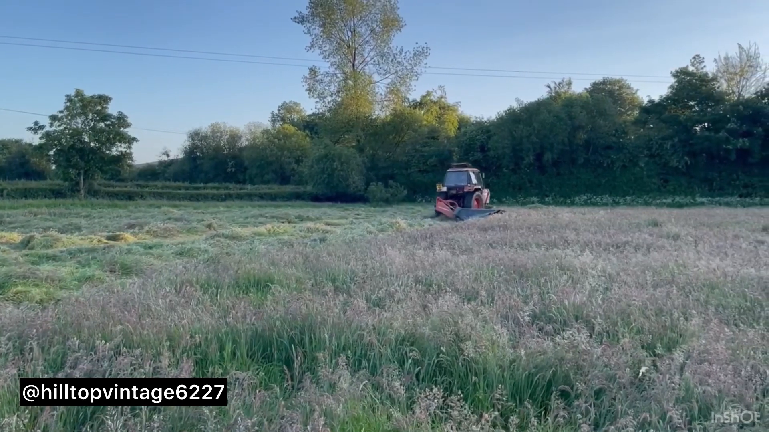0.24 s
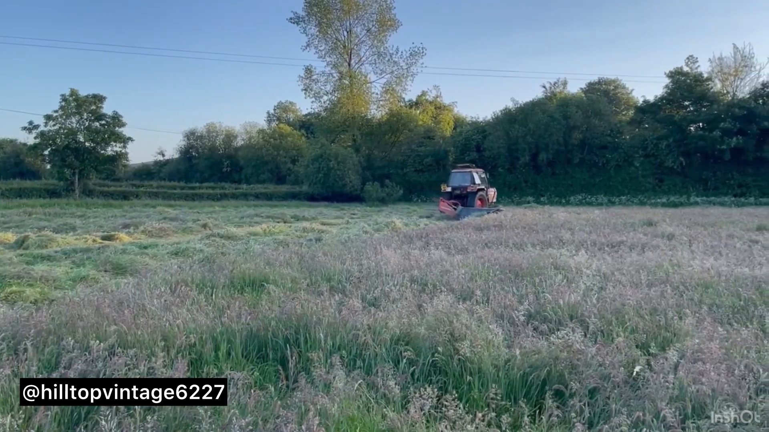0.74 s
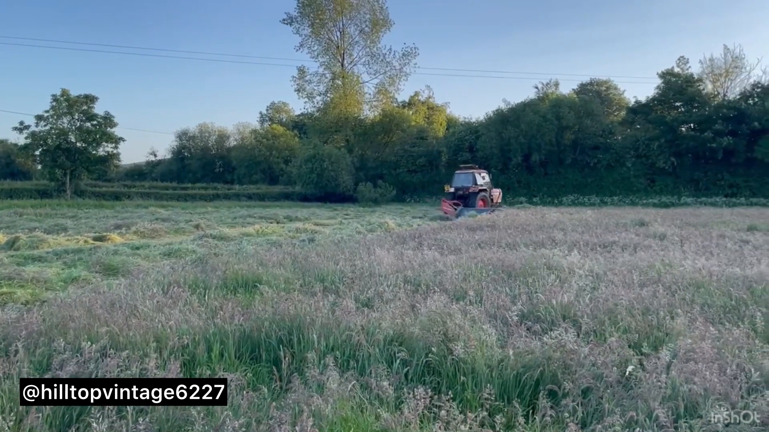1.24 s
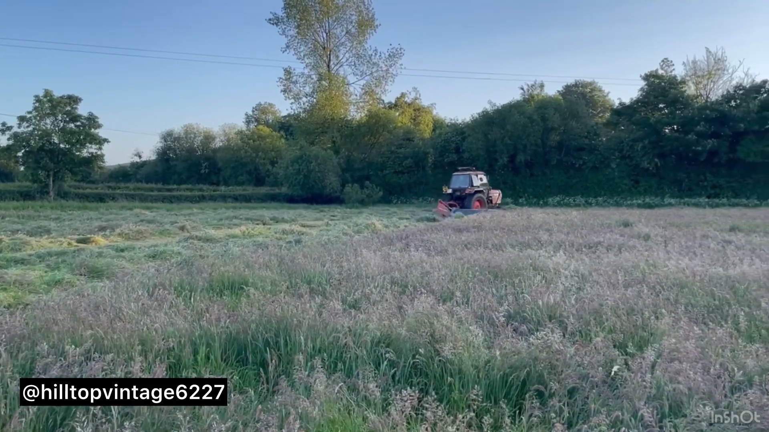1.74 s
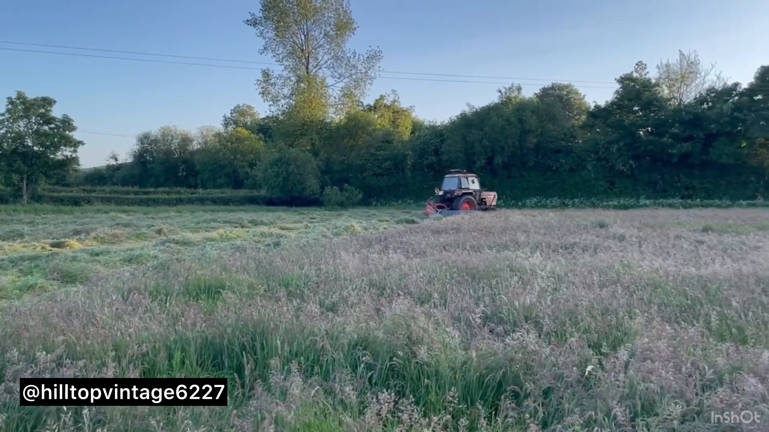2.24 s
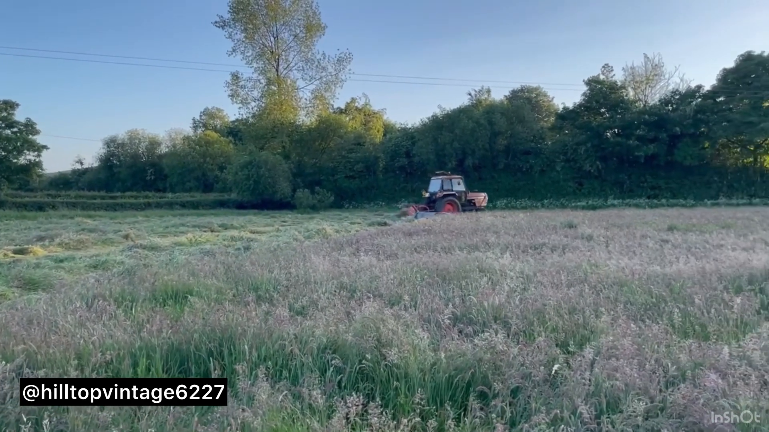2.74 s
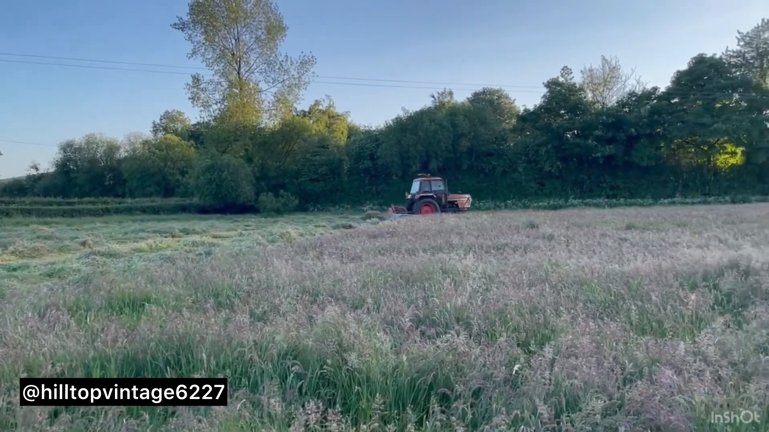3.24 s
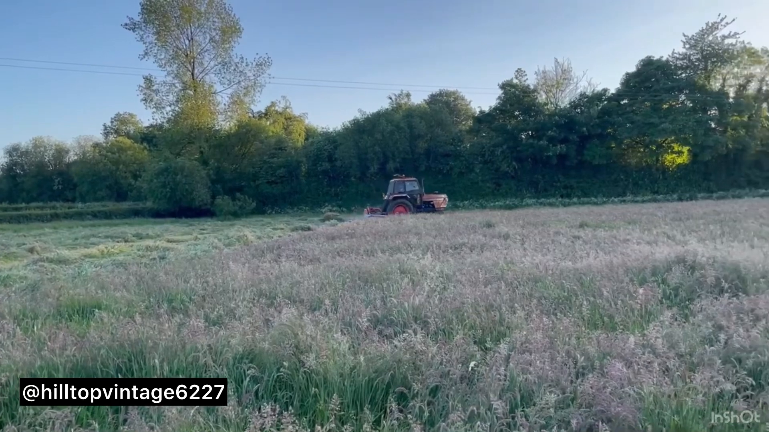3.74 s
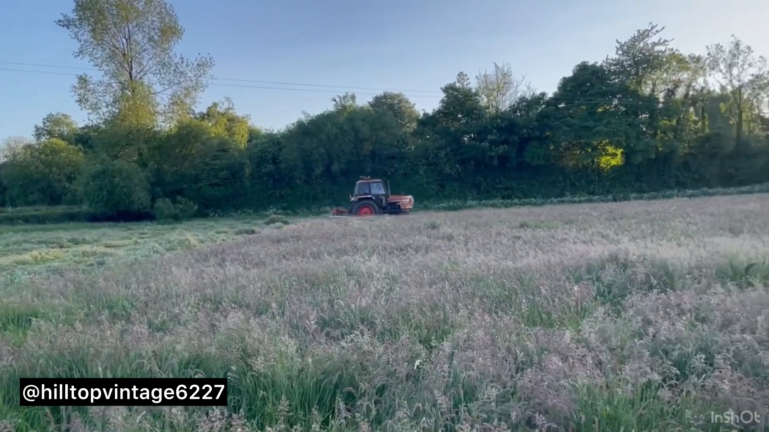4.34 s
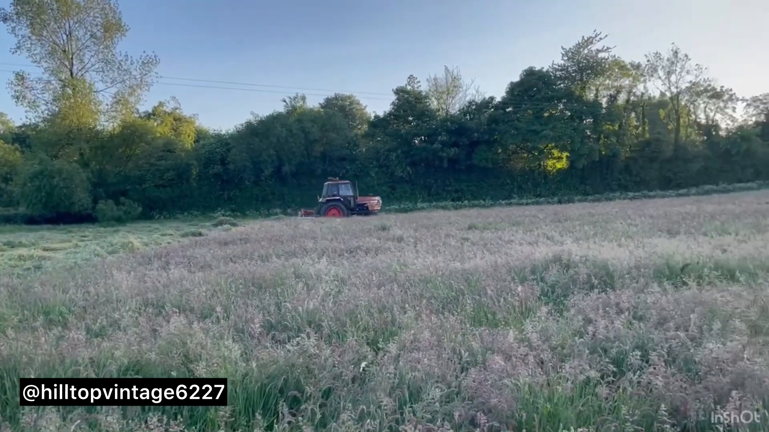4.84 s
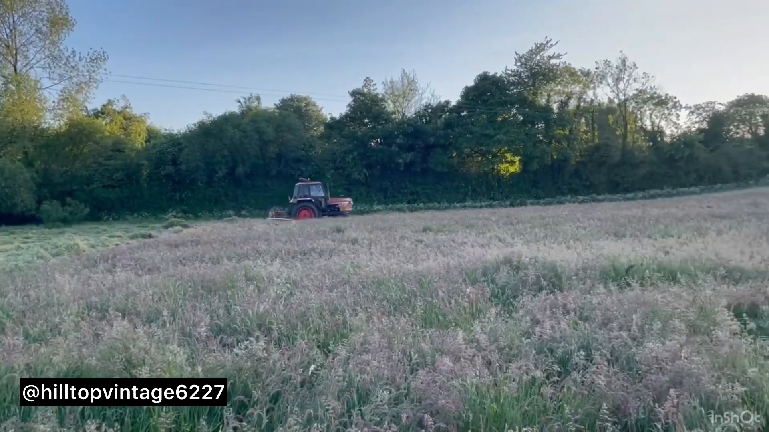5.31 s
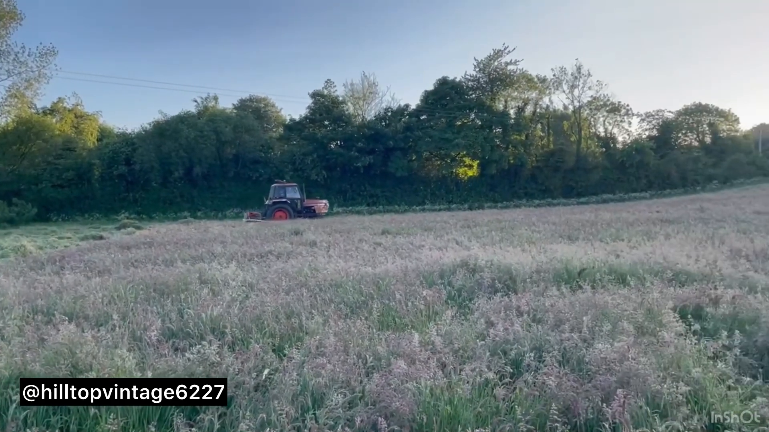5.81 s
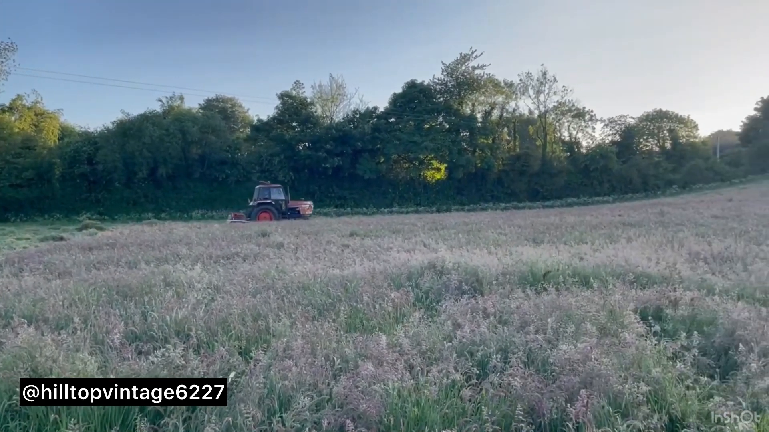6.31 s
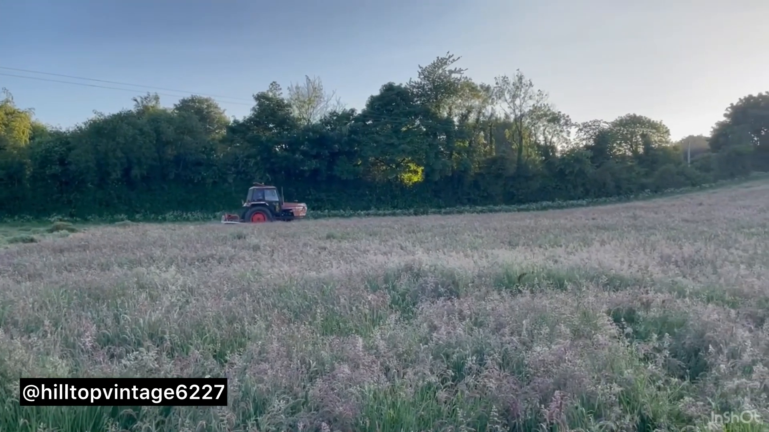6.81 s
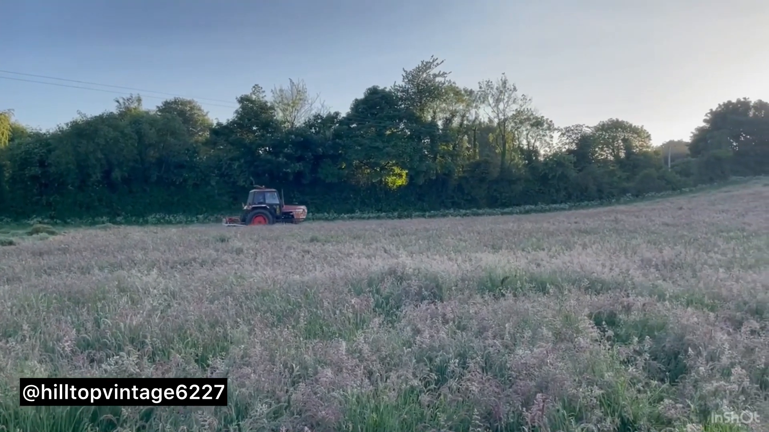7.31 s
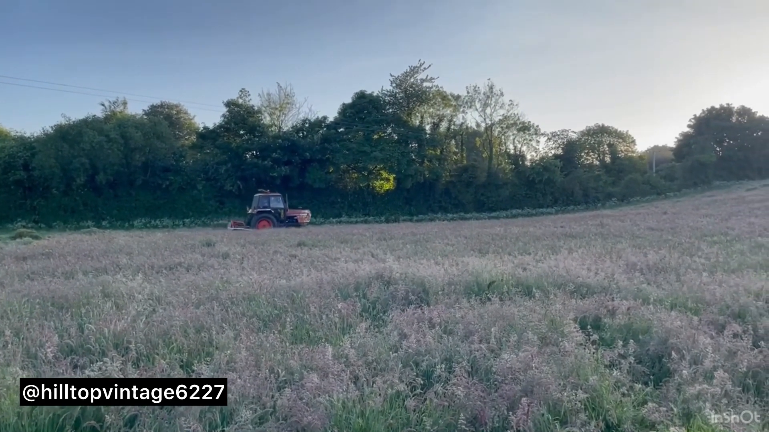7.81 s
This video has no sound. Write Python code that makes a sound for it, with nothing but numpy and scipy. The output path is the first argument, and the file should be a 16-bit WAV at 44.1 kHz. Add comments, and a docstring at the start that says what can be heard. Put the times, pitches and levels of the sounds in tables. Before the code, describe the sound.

Continuous outdoor drone of a tractor pulling a disc mower, heard from a distance with no start or stop. Dense diesel knocking rides over blade hum and hissing grass. Early on there is a soft wind rumble, a faint gear whine and small high clicks; midway the knock sharpens and the roar grows a little, then short metallic rattles come and go. Stereo microphone, open air, no echo.

```python
"""Tractor mowing a meadow

A four-cylinder diesel some way off drives a disc mower and slowly turns side-on. Geared sines make exhaust
beat and blade hum; decaying modes make the knock; shaped noise makes the roar and the wash of cut grass.
A gear whines, a faint fuzzy high tone lies near 7.7 kHz, a jolted part rattles, grains tick in the treble,
and low noise is light wind at a two-port microphone."""
import sys
import numpy as np
from scipy import signal
from scipy.io import wavfile
from scipy.ndimage import uniform_filter1d

SR = 44100
rng = np.random.default_rng(int(sys.argv[2]) if len(sys.argv) > 2 else 0)


def store_pcm(level_fs):
    """Save levels as 16-bit WAV."""
    pcm = np.round(np.clip(level_fs, -1, 1) * 32767).astype(np.int16)
    wavfile.write(sys.argv[1], SR, np.atleast_2d(pcm).T)


N = 355446
IGNITION_BEATS = 0.29  # place of the bang within each exhaust beat


def amp(db):
    """Decibels to amplitude."""
    return 10 ** (np.asarray(db) / 20)


def evened(x):
    """Scale to unit RMS."""
    return x / np.sqrt(np.mean(x ** 2) + 1e-20)


def curves(rows, t=None):
    """Columns of a time table, joined by straight lines."""
    if t is None:
        t = np.arange(N) / SR
    s, *columns = np.transpose(rows)
    return [np.interp(t, s, c) for c in columns]


def spectra(rows, hz):
    """Columns of a frequency table over log frequency, as column vectors."""
    f, *columns = np.transpose(rows)
    return [np.interp(np.log(hz + 1), np.log(f + 1), c)[:, None] for c in columns]


def wander(cutoff_hz):
    """Slow random drift of unit RMS: low-passed noise."""
    lowpass = signal.butter(2, cutoff_hz, fs=SR, output="sos")
    return evened(signal.sosfilt(lowpass, rng.standard_normal(N)))


def tone(turns, rms_db):
    """Sine from its phase in turns."""
    return np.sqrt(2) * amp(rms_db) * np.sin(2 * np.pi * turns)


def frames(x):
    """Short-time spectrum."""
    return signal.stft(x, SR, nperseg=1024, noverlap=768)


def unframe(z):
    """Waveform of a short-time spectrum."""
    return signal.istft(z, SR, nperseg=1024, noverlap=768)[1][..., :N]


# Turn of the machine, and shading of the right port. Each row: time in seconds, heading from 0 = rear to 1 =
# side-on, roar level in dB, shading of the right port from 0 to 1.
TURN_PATH = [(0, 0.28, -36.5, 0.06), (1, 0.35, -36.5, 0), (2, 0.41, -35.5, 0), (3, 0.56, -35, 0.12),
             (4, 0.72, -33.5, 0.14), (5, 0.94, -33, 0.65), (6, 0.93, -34, 1), (7, 0.91, -34, 1),
             (8.06, 1, -33.5, 0.8)]


def turn(t=None):
    """Heading and roar level as the machine turns, and the shading of the right port over time."""
    return curves(TURN_PATH, t)


# Engine speed. Each row: time in seconds, firings per second.
FIRING_RATE = [(0.0, 56.86), (0.82, 56.6), (1.08, 55.9), (1.4, 57.2), (1.65, 56.3), (2.89, 56.24),
               (3.38, 57.46), (4.15, 56.35), (4.92, 56.52), (5.11, 55.69), (5.7, 56.66), (5.93, 56.03),
               (6.18, 57.16), (6.81, 55.81), (7.12, 57.35), (7.46, 55.83), (8.06, 56.95)]


def firing_rate(t=None):
    """Firings per second, which also pace the geared parts."""
    return curves(FIRING_RATE, t)[0]


# Wind spectrum. Each row: frequency in Hz, relative level in dB.
WIND_SPECTRUM = [(25, -12), (36, -8), (45, 13), (70, 11), (110, 9.5), (150, 6), (200, -4.5), (300, -91)]
# Wind strength. Each row: time in seconds, level in dB.
WIND_GUSTS = [(0, -32.5), (.35, -39), (.95, -29.5), (1.6, -39), (3.3, -36.5), (4.7, -42), (5.5, -44),
              (8.06, -40)]


def wind():
    """Lumpy low noise at the microphone, nearly alike at both ports."""
    hz, _, z = signal.stft(rng.standard_normal((2, N)), SR, nperseg=4096)
    shaped = z * amp(spectra(WIND_SPECTRUM, hz)[0])
    noise = signal.istft(shaped, SR, nperseg=4096)[1][:, :N]
    common, difference = evened(noise) * amp(curves(WIND_GUSTS)[0] + 1.8 * wander(7))
    return common + 0.048 * difference * np.array([[1], [-1]])


# Treble ticks. Each row: start in seconds, nominal level in dB, centre frequency in Hz.
TICK_EVENTS = [(0.6389, -57, 10100), (0.6549, -56, 10500), (0.6716, -43, 10300), (0.7632, -60, 10500),
               (0.8684, -58, 10800), (0.9572, -54, 11400), (0.9807, -54, 10900), (0.992, -56, 9900),
               (1.0146, -53, 11000), (1.034, -58, 11100), (1.2431, -57, 10200), (1.259, -55, 10100),
               (1.276, -55, 10300), (1.387, -53, 11300), (1.404, -56, 11600), (1.6472, -56, 10100),
               (2.0343, -51, 9900), (2.052, -53, 9850), (2.127, -44.5, 10000), (2.251, -52, 10300),
               (2.2682, -50, 10000), (2.3206, -55, 10200), (2.3391, -53, 10300), (2.6758, -56, 10400),
               (2.6928, -58, 10500), (2.7811, -49, 10200), (4.5477, -48, 10060), (4.6364, -56, 10000),
               (4.8135, -57, 10500), (5.8636, -57, 10100)]


def ticks():
    """Each tick is a tight burst of five short high grains, most of them weaker than the one before."""
    rise_s, spacing_s, spread_hz = 0.0007, 0.0014, 1000
    out, t = np.zeros(N + 2000), np.arange(200) / SR
    envelope = (t / rise_s) * np.exp(1 - t / rise_s)
    luck = rng.random((len(TICK_EVENTS), 3, 5))
    for (start_s, db, hz), (late, off, size) in zip(TICK_EVENTS, luck):
        for k in range(5):
            delay_s = k * spacing_s * (0.6 + 0.8 * late[k])
            grain_hz = hz + spread_hz * (off[k] - 0.5)
            grain = envelope * np.sin(2 * np.pi * grain_hz * t)
            i = round((start_s + delay_s) * SR)
            out[i:i + 200] += amp(db + 8.0 - 2.1 * k - 3.5 * size[k]) * grain
    return out[:N]


# Rattle jolts, four to every two firings: relative level in dB.
JOLT_PATTERN_DB = [-4, -1, -12, -4]
# Bouts of rattling. Each row: start in seconds, length in seconds, mean level in dB.
RATTLE_BOUTS = [(3.913, 0.1, -46), (4.15, 0.037, -46), (4.25, 0.17, -49), (4.57, .16, -48.5),
                (4.93, 0.19, -47), (5.33, 0.092, -43), (5.48, 0.063, -43), (5.62, .06, -46),
                (5.74, .04, -45), (5.92, 0.091, -45.5), (6.043, .06, -44), (6.2, .1, -44), (6.59, .07, -46),
                (6.7, 0.13, -46.5), (6.865, 0.15, -43.5), (7.528, .22, -47), (7.796, .18, -46)]


def rattle(fired):
    """A loose part is jolted in a pattern that repeats every two firings; each jolt rings briefly."""
    between_bouts_db, peak_over_mean_db = -52.5, 7
    ring_hz, rise_s = 4195, 0.0025
    at = np.flatnonzero(np.diff((2 * fired + 1.1).astype(int)))
    luck = rng.standard_normal((len(at), 2))
    out, t = np.zeros(N + 800), np.arange(800) / SR
    envelope = (t / rise_s) * np.exp(1 - t / rise_s)
    level_db = between_bouts_db - 10 * (1 - turn()[0])  # fainter towards the rear
    for start_s, length_s, db in RATTLE_BOUTS:
        level_db[round(start_s * SR):round((start_s + length_s) * SR)] = db
    for k, i in enumerate(at):
        ring = envelope * np.sin(2 * np.pi * (ring_hz + 30 * luck[k, 0]) * t)
        jolt_db = JOLT_PATTERN_DB[(k + 2) % 4] + 3 * luck[k, 1]
        out[i:i + 800] += amp(level_db[i] + peak_over_mean_db + jolt_db) * ring
    return out[:N]


# Gear whine. Each row: time in seconds, level in dB.
GEAR_LEVEL = [(0, -50), (.25, -43), (.47, -50), (.65, -43), (1.05, -49), (1.45, -41), (1.6, -52),
              (8.06, -52)]
# Faint high tone. Each row: time in seconds, frequency in Hz.
HIGH_TONE_PITCH = [(0, 7600), (4.9, 7700), (5.6, 7880)]


def whines(fired):
    """A gear whine tied to the shaft speed and a faint fuzzy high tone near 7.7 kHz."""
    contacts_per_firing, high_tone_db = 22.12, -64.5
    gear_turns = contacts_per_firing * fired + 0.017 * wander(11)
    gear = tone(gear_turns, curves(GEAR_LEVEL)[0] + 2.0 * wander(21))
    high_tone_hz = curves(HIGH_TONE_PITCH)[0] + 15 * wander(40)
    return gear + tone(np.cumsum(high_tone_hz) / SR, high_tone_db + 3 * wander(15))


# Roar spectrum. Each row: frequency in Hz, dB from the rear, dB from the side,
# share of power that pulses with the firings.
BODY_SPECTRUM = [(175, -12.5, -2.5, 0.38), (305, -10.5, -33.5, 0.061), (346.7, -10, -6.5, 0.081),
                 (454, -15, -15, 0.1), (956, -5.5, -6, 0.16), (1332, -6.5, -9, 0.25),
                 (1656, -10, -20, 0.23), (1973, -7, -8, 0.18), (2370, -17.5, -20.5, 0.094),
                 (3150, -12.5, -15, 0.075), (3440, -12.5, -22.5, 0.11), (4240, -17, -18, 0.16),
                 (4650, -18, -23, 0.33), (7440, -21, -28, 0.36), (7680, -40.5, -55.5, 1),
                 (9500, -27, -37, 0.66), (11730, -39.5, -48, 0.15), (12800, -56, -52, .3)]
# Panel resonances added to the roar. Each row: frequency in Hz, width (two sigma) in Hz,
# boost in dB from the rear, boost in dB from the side.
PANEL_RESONANCES = [(662, 360, 8, 5), (2230, 81, 4.5, 6.5), (2377, 200, 4, 7), (2600, 350, 5.5, 5.5),
                    (3550, 230, 7.5, -1.5), (3650, 39, -2.5, 2.5), (4160, 240, 7, -5.5), (5650, 760, -1, 3),
                    (7694, 250, 21, 30)]
# Firing hiss of the four cylinders in turn: relative level in dB.
CYLINDER_HISS_DB = [0, 0.64, -0.017, 0.4]


def firing_gate(fired):
    """Each firing opens the noise quickly and lets it sink until the next; times in beats."""
    rise_beats, decay_beats = 0.084, 1.13
    beats = fired - IGNITION_BEATS + 4
    stroke, phase = beats.astype(int), beats % 1
    strength_db = np.array(CYLINDER_HISS_DB)[stroke % 4] + 2.2 * rng.standard_normal(N // 500)[stroke]
    return amp(strength_db) * (1 - np.exp(-phase / rise_beats)) * np.exp(-phase / decay_beats)


def air_patches(hz, t):
    """Moving air over the field makes patches of the spectrum swell and fade, in dB."""
    def smooth_noise(bins, steps):
        noise = rng.standard_normal((len(hz), len(t)))
        return evened(uniform_filter1d(uniform_filter1d(noise, bins, 0), steps, 1))

    treble = np.clip(hz[:, None] / 5000, 0, 1.5)
    return 0.81 * (smooth_noise(14, 25) + 0.98 * treble * smooth_noise(90, 16))


def roar(fired):
    """Firing-gated noise and a steady wash of grass and air share one body; two unrelated draws."""
    swish_hz, swish_at_s, swish_db = 6100, 3.94, 2  # the swish of cut grass brightens for a moment
    hz, t, pulsing = frames(evened(firing_gate(fired) * rng.standard_normal((2, N))))
    wash = frames(rng.standard_normal((2, N)))[2]
    heading, level_db, _ = turn(t)
    rear_db, side_db, share = spectra(BODY_SPECTRUM, hz)
    for f, width_hz, rear, side in PANEL_RESONANCES:
        bump = np.exp(-0.5 * ((hz[:, None] - f) / (width_hz / 2)) ** 2)
        rear_db, side_db = rear_db + rear * bump, side_db + side * bump
    octaves_off = np.log2(hz[:, None] / swish_hz + 1e-9)
    swish = swish_db * np.exp(-((t - swish_at_s) / 0.5) ** 2 - (2 * octaves_off) ** 2)
    z = (np.sqrt(share) * pulsing + np.sqrt(1 - share) * wash) * (hz[:, None] > 60)
    z *= amp(rear_db + heading * (side_db - rear_db) + swish + air_patches(hz, t))
    rms = np.sqrt(np.mean(unframe(z) ** 2))
    return unframe(z * amp(level_db) / rms)


# Blade hum. Each row: time in seconds, blade hum in dB, its octave in dB.
BLADE_LEVELS = [(0.0, -33.5, -40), (0.09, -31, -35), (1.01, -30.5, -44), (1.34, -31.5, -61),
                (1.57, -30, -40), (2.4, -34, -44.5), (3.59, -36, -33.5), (4.18, -30.5, -37),
                (4.24, -30.5, -51), (4.33, -33, -35), (5.0, -30.5, -43), (5.09, -26.5, -30.5),
                (5.81, -29, -42), (6.08, -29, -33.5), (7.9, -33, -37.5), (8.06, -39, -45.5)]
# Third harmonic of the blade hum. Each row: time in seconds, level in dB.
BLADE_THIRD_LEVEL = [(0, -52.5), (2.6, -51.5), (2.9, -71), (3.6, -64), (4.4, -56), (4.9, -62), (5.3, -57.5),
                     (7.1, -58), (8.06, -60)]
# Further machine lines, from engine, gear and blades. Each row: multiple of the firing rate, level in dB.
MACHINE_LINES = [(1.25, -49), (1.75, -50), (2.25, -49), (6.233, -53), (7.45, -57), (17, -53), (19, -55)]


def hum(fired, heading):
    """Exhaust beat, blade hum and further machine lines as wavering sines geared to the firings."""
    blade_passes_per_firing = 1.4905  # set by the gearing
    beat_db, octave_rear_db, octave_side_db = -32, -29.5, -40
    # the governor cuts fuel when the engine runs ahead: the exhaust beat softens a moment later
    usual_firings_per_s, db_per_firing_per_s, fuel_lag_s = 56.42, -2.5, 0.094
    ahead = firing_rate(np.arange(N) / SR - fuel_lag_s) - usual_firings_per_s
    fuel_db = db_per_firing_per_s * uniform_filter1d(ahead, SR // 6)
    # the beat's octave changes sign between rear and side
    octave = (1 - heading) * amp(octave_rear_db) - heading * amp(octave_side_db)
    out = tone(fired + 0.32, beat_db + fuel_db + 0.8 * wander(3))
    out += octave * tone(2 * fired + 0.29, fuel_db + 2 * wander(3))
    blades = blade_passes_per_firing * fired
    blade_db, blade_octave_db = curves(BLADE_LEVELS)
    out += tone(blades + 0.22, blade_db) + tone(2 * blades + 0.3, blade_octave_db)
    third_db = curves(BLADE_THIRD_LEVEL)[0] + 2.9 * wander(3.3)
    out += tone(3 * blades + 0.11 * wander(7.4), third_db)
    for multiple, db in MACHINE_LINES:
        out += tone(multiple * fired + 0.04 * wander(3), db + 2.5 * wander(2.5))
    return out


# Modes rung by each bang. Each row: frequency in Hz, rise in seconds, t60 in seconds, dB from the rear,
# dB from the side, signed push of cylinders 1 to 4 (a factor).
KNOCK_MODES = [(398, .001, .07, -40, -39, .35, .3, 1, .35), (507, .001, .08, -38, -41, .4, .4, 1, .4),
               (590, .002, .05, -45, -38, .4, -.4, 1, -.4), (760, .007, .045, -39, -30, .4, -.45, 1, -.3),
               (890, .003, .04, -44, -35, .4, 1, .4, .5), (960, .003, .05, -43, -37, .5, 1, .6, .6),
               (1070, .002, .04, -46, -40, .6, 1, .7, .7), (2000, .0005, .016, -48, -33, .5, .8, 1, .8),
               (2150, .0005, .02, -46, -37, .6, .8, 1, .7), (2300, .0005, .025, -43.5, -39, .8, .8, 1, .6),
               (2800, .0006, .015, -48, -43, 1, 1, .6, .8)]


def knocks(fired, heading):
    """Each bang rings block and exhaust modes, much alike from one cycle to the next."""
    # the sharp knock above bright_hz is loudest midway through the turn
    bright_hz, bright_at_s, bright_span_s, bright_db = 1800, 3.6, 1.1, 5
    at = np.flatnonzero(np.diff((fired - IGNITION_BEATS + 1).astype(int)))
    luck = rng.standard_normal((len(at), 2, len(KNOCK_MODES)))
    t, out = np.arange(4000) / SR, np.zeros(N)
    bright = bright_db * np.exp(-0.5 * ((at / SR - bright_at_s) / bright_span_s) ** 2)
    for k, (hz, rise_s, t60_s, rear_db, side_db, *push) in enumerate(KNOCK_MODES):
        db = rear_db + heading[at] * (side_db - rear_db) + 0.69 * luck[:, 0, k]
        db += (hz > bright_hz) * bright
        jittered = np.clip(at + (7 * luck[:, 1, k]).astype(int), 0, N - 1)
        bangs = np.zeros(N)
        bangs[jittered] = amp(db) * np.resize(push, len(at))
        ring = (1 - np.exp(-t / rise_s)) ** 2 * amp(-60 * t / t60_s) * np.sin(2 * np.pi * hz * t)
        out += signal.oaconvolve(bangs, ring / ring.max())[:N]
    return out


# Likeness of the ports. Each row: frequency in Hz, likeness from 0 to 1 and lag of the right port in radians
# when unshaded, likeness and lag in radians in shade.
PORT_LIKENESS = [(55, .995, .08, .998, .15), (370, .98, .12, .97, .39), (770, .985, .04, .97, .43),
                 (1350, .985, .02, .92, .5), (1650, .93, .03, .72, .95), (2150, .95, .05, .78, 1.3),
                 (2300, .92, .9, .8, 2.5), (2450, .7, 3.2, .78, 4.5), (2600, .92, 5.6, .9, 5.9),
                 (2850, .95, 6.5, .92, 7.3), (3200, .95, 6.6, .9, 6.7), (4000, .93, 6.4, .74, 6.2),
                 (4400, .78, 7, .68, 7), (4900, .66, 6.55, .75, 7.1), (5600, .85, 6.1, .78, 6.3),
                 (6500, .85, 5.3, .8, 5.5), (7400, .88, 3.8, .86, 3.6), (8000, .995, 3.14, .995, 3.14),
                 (8800, .98, 3.14, .98, 3.14), (9600, .66, 1.7, .52, 2), (10500, .86, .8, .87, .25),
                 (11200, .99, 0, .99, 0)]
# Right port response. Each row: frequency in Hz, level in dB when unshaded, change in dB in full shade.
PORT_LEVELS = [(55, .6, .2), (170, 0, 0), (500, -.5, -1.2), (1050, -2.7, -2.3), (1650, .5, -4.5),
               (2050, -3.5, -5.5), (2250, -1, -6), (2450, -6, -1), (2700, 0, -1), (3300, -1, -2.3),
               (4000, -1.2, -4), (4900, -5, .5), (5600, -3.5, 0), (7800, 0, 0)]


def ports(direct, scattered):
    """The right port hears the direct sound lagged and shaded, mixed with sound scattered by the field."""
    hz, t, z = frames(direct)
    like, lag, shade_like, shade_lag = spectra(PORT_LIKENESS, hz)
    open_db, shade_db = spectra(PORT_LEVELS, hz)
    shade = turn(t)[2]
    like = like + shade * (shade_like - like)
    lag = lag + shade * (shade_lag - lag)
    right = like * np.exp(-1j * lag) * z + np.sqrt(1 - like ** 2) * frames(scattered)[2]
    return np.array([direct, unframe(right * amp(open_db + shade_db * shade))])


def scene():
    """Machine and ticks heard through the two ports, plus wind."""
    fired, heading = np.cumsum(firing_rate()) / SR, turn()[0]
    near, scattered = roar(fired)
    machine = near + knocks(fired, heading) + hum(fired, heading) + whines(fired) + rattle(fired)
    return ports(machine + ticks(), scattered) + wind()


def record(dry):
    """The band limit of the recorder: a steep low-pass."""
    edge_hz = 12900
    lowpass = signal.firwin(511, edge_hz, window=("kaiser", 9), fs=SR)
    return signal.oaconvolve(dry, lowpass[None], "same")


dry = scene()
out = record(dry)
store_pcm(out)
```